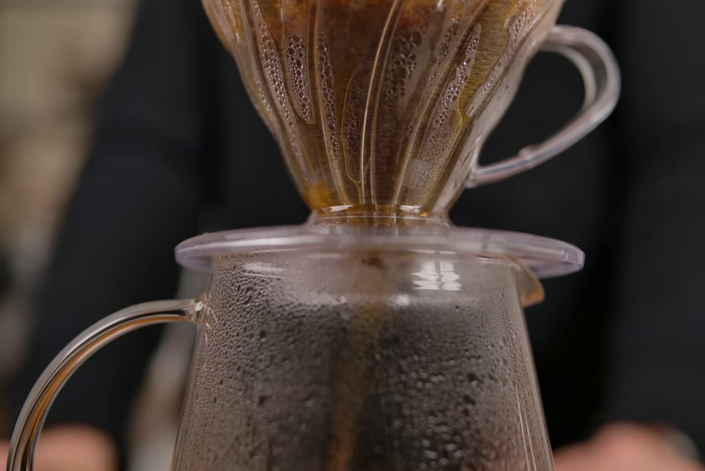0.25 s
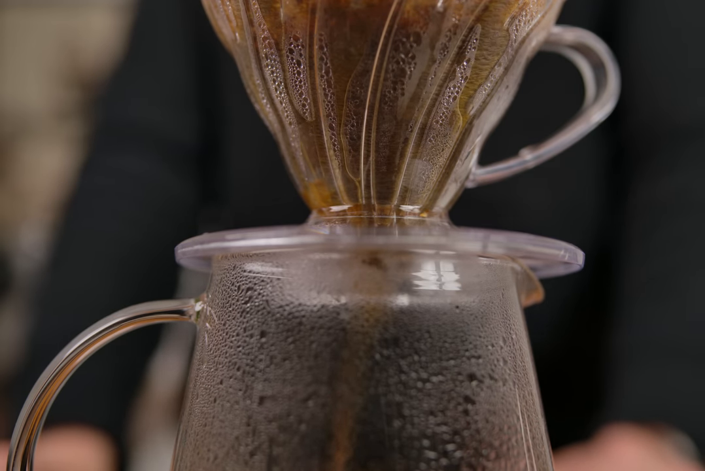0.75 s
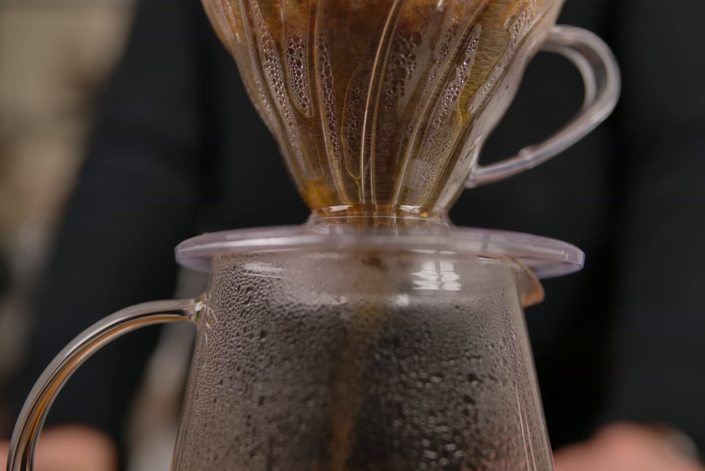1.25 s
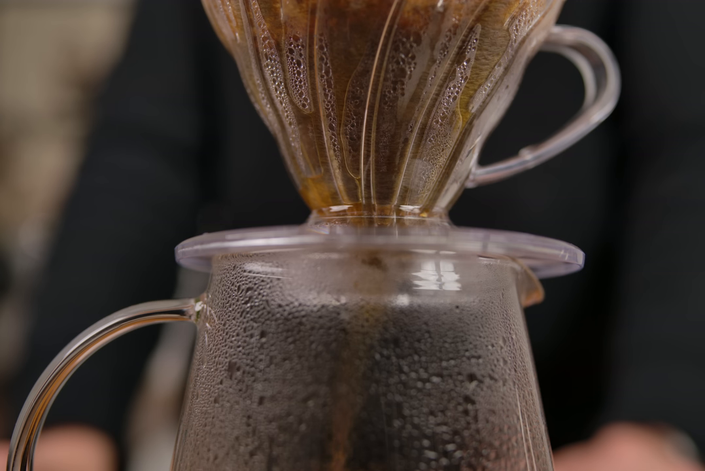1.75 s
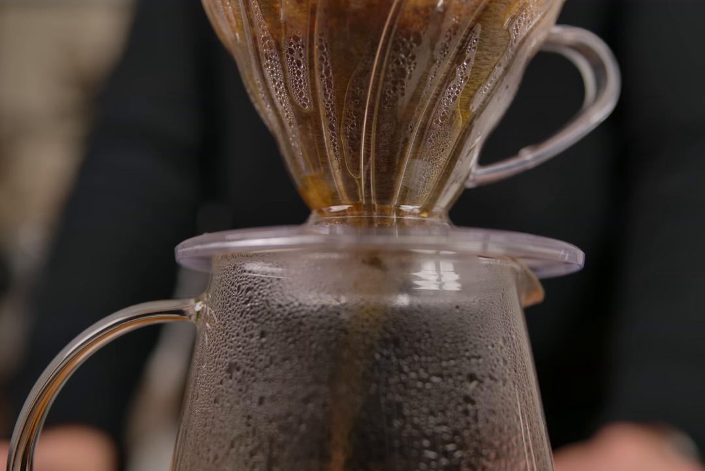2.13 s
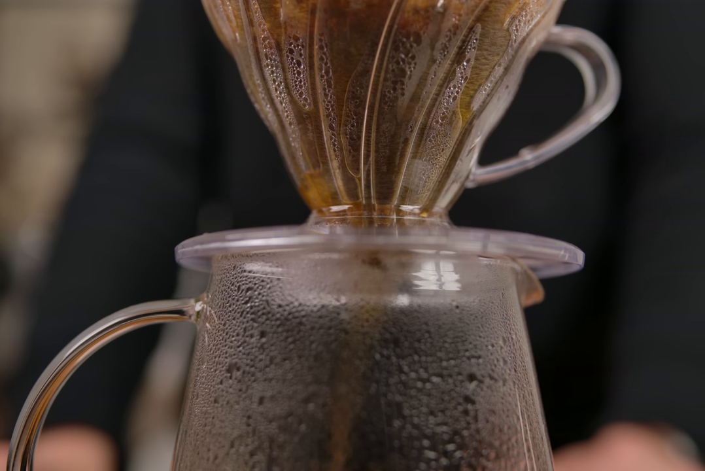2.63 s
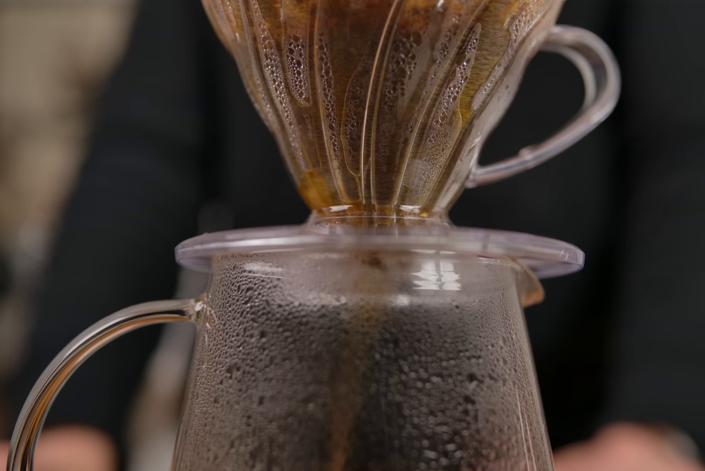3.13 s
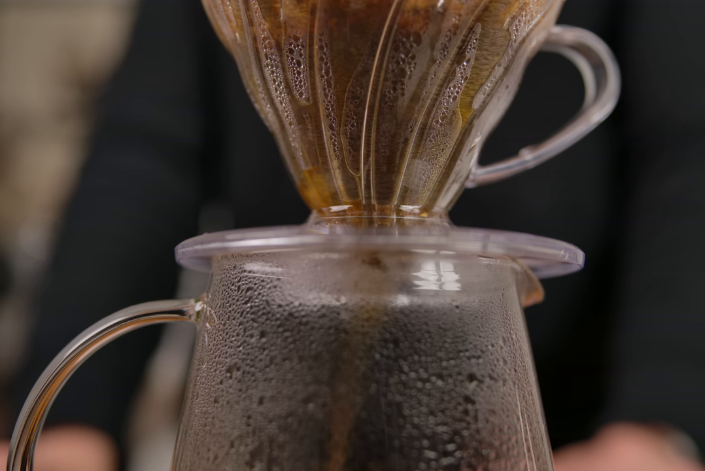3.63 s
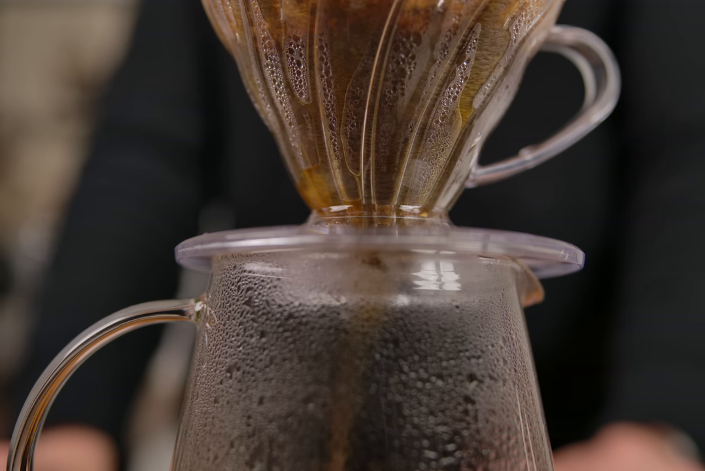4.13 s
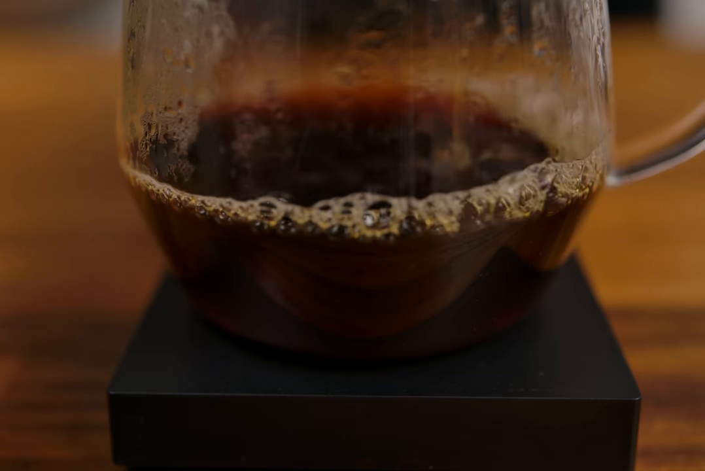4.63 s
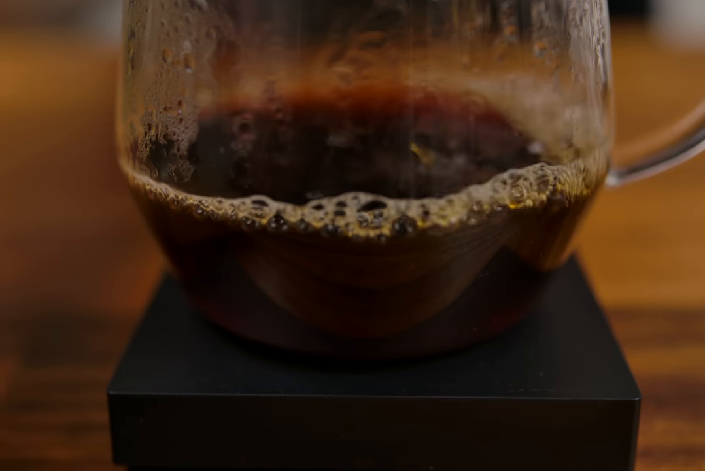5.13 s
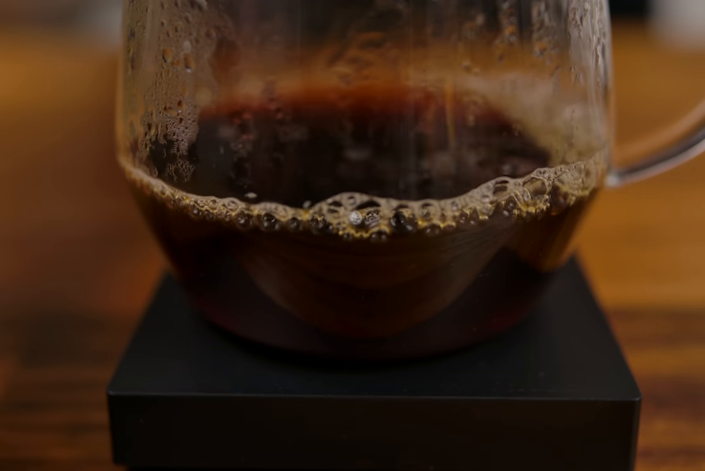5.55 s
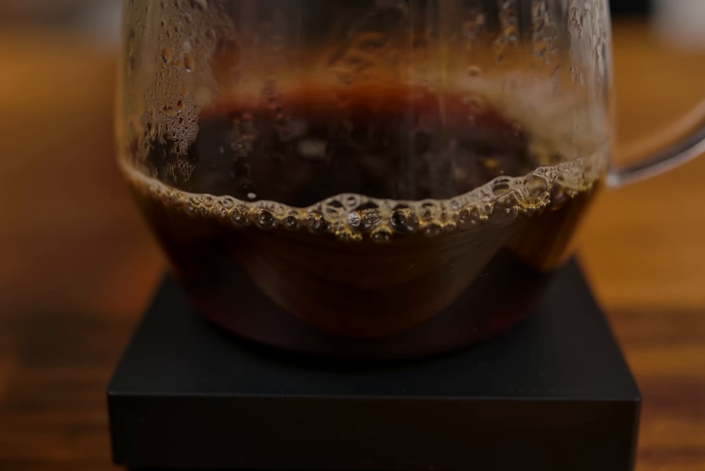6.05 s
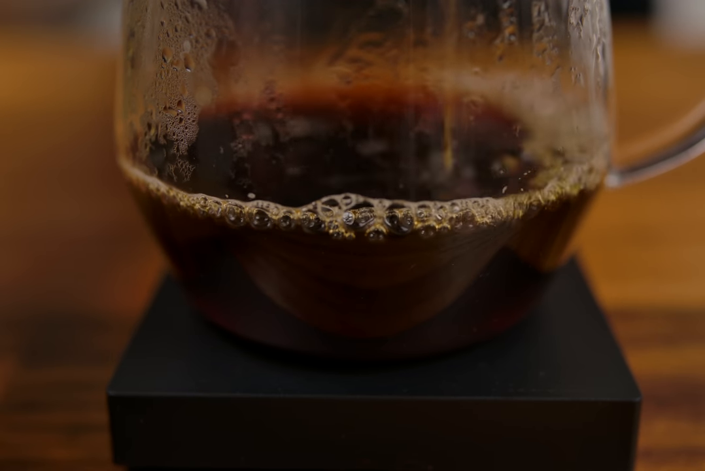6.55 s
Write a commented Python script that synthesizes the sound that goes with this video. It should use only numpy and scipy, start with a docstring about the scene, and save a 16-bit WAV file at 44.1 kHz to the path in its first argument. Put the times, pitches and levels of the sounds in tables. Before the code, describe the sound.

A steady, uneven trickle of drops falls into coffee in a glass vessel, already under way at the start. Watery plips vary between low and bright pitches, with small slaps, hollow air-column knocks and fine spray ticks. Foam bubbles pop sharply in between. The flow continues throughout, loosening late on. Heard very close and centred, with short reflections and a quiet rumbling room.

```python
"""Brewed coffee runs into a half-filled glass server, close-miked, over a soft room rumble and faint hiss.
From the start a thin stream patters as beads, tiny bubbles and fine splashes, with a treble fizz and haze.
Almost at once froth bubbles begin to burst, each a film snap with an upward chirp from its cavity.
Drops follow: each rings a trapped bubble, slaps the surface, booms the air column, thuds the server
and throws spray, then a smaller satellite trails it. The server's modes and a short room echo colour the coffee."""
import sys
import numpy as np
from scipy import signal
from scipy.fft import rfft, irfft, next_fast_len
from scipy.io import wavfile
from scipy.ndimage import uniform_filter1d

SR = 44100
rng = np.random.default_rng(int(sys.argv[2]) if len(sys.argv) > 2 else 0)


def output_pcm(signal):
    """Save a mono or channel-first signal as 16-bit PCM at the path in sys.argv[1].

    Samples are clipped to [-1, 1] before scaling.
    """
    pcm = np.clip(np.atleast_2d(signal).T, -1, 1) * 32767
    wavfile.write(sys.argv[1], SR, np.round(pcm).astype(np.int16))


N = 299880
RING = np.arange(4096) / SR  # time axis of one ringing sound (s)

# Room tone spectra. Each row: frequency in Hz, relative gain in dB.
RUMBLE_COLOUR = [(20, -15), (35, -34), (55, -9), (80, -0.5), (105, 1), (135, -3), (180, -12), (310, -15.5),
                 (372, -6.5), (450, -19), (570, -22.5), (680, -28.5), (1500, -34), (4000, -44.5)]
HISS_COLOUR = [(500, -3), (3000, 16.5), (6000, 6.5), (10000, 2.5), (16000, -35)]

# Resonances of the server and the air in it. Each row: centre in Hz before detuning, width in Hz,
# peak gain in dB over a unit impulse before the landing spot's scatter.
SERVER_MODES = [(374, 42, 16), (560, 100, 7), (890, 130, 11), (1122, 80, 11), (1310, 45, 5), (1382, 45, 5),
                (1580, 150, 4), (1748, 65, 9), (1880, 70, 7), (1955, 45, 14), (2332, 35, 15),
                (2435, 70, 10), (2514, 30, 19), (2980, 260, 4), (3555, 140, 13), (4820, 90, 6),
                (4930, 130, 13), (5115, 50, 18), (5372, 45, 11), (5945, 60, 13), (6500, 190, 14),
                (7200, 400, 2), (7730, 110, 4), (8350, 260, 7), (9300, 420, 3), (13000, 700, 3)]
SLOSH = .003  # scatter of the mode pitches from the rocking surface, as a share

# Thin stream. Each row: time in seconds, level in dB before the patter and bead trims.
STREAM_LEVEL = [(0.0, -52), (0.09, -52.5), (0.64, -57.5), (1.19, -53), (1.61, -62), (1.87, -55),
                (2.05, -57.5), (2.4, -55.5), (2.56, -54), (3.03, -58), (3.2, -57.5), (3.31, -54),
                (3.45, -67), (3.56, -51), (3.81, -54.5), (4.11, -57.5), (4.24, -60.5), (4.51, -51),
                (4.75, -61), (4.96, -57.5), (5.36, -62), (5.51, -54.5), (5.79, -56), (6.02, -52.5),
                (6.19, -57.5), (6.8, -58.5)]
# Treble fizz of the stream. Each row: time in seconds, level in dB before the fizz trim.
FIZZ_LEVEL = [(0, -65.5), (0.3, -61.5), (0.48, -69), (0.62, -60.5), (0.83, -68), (1.05, -65), (1.32, -62.5),
              (1.6, -67.5), (2.25, -63.5), (2.55, -62), (2.8, -65), (3.42, -63), (3.56, -58), (4.2, -72.5),
              (4.55, -61), (4.85, -66.5), (5.5, -62), (5.83, -72), (6.08, -61), (6.3, -70.5), (6.8, -65.5)]
PATTER_TRIM_DB, BEADS_TRIM_DB, FIZZ_TRIM_DB = -5, -3, -0.5
# Spectral shaping of patter, fizz and haze. Each row: frequency in Hz, relative gain in dB.
PATTER_COLOUR = [(300, 29.5), (650, 12), (900, 10.5), (1300, -12), (1900, 15), (2500, 9), (3000, -10),
                 (4000, 2), (8000, -22)]
FIZZ_COLOUR = [(1000, -18), (3000, 5), (4300, 12.5), (5100, -3), (6000, 3), (7500, 2), (11000, -3),
               (16000, 2)]
HAZE_COLOUR = [(1000, -31), (2800, -0.5), (4000, 0.5), (6500, -10.5), (9000, -14), (16000, -28)]
# where the fizz is densest it merges into a smooth hiss: top level (dB), dB per dB of fizz
HAZE_DB, HAZE_GROWS = -65, 1.8
STIR, STIR_S = 0.32, 0.0025  # rms share by which drops stir up the flow, time to peak (s)
LULL, LULL_S = 0.35, 0.005  # share lost as the stream necks off, deepest this long before a drop (s)
SPLASH_LIFE_S, SPLASH_RANGE_DB = 0.0013, 29  # time to peak; largest splash over the smallest
# Beads of the stream. Each row: time in seconds, typical bubble pitch in Hz before scatter.
BEAD_PITCH = [(0, 1575), (1.5, 1450), (2.4, 1720), (6.8, 1823)]
# level scatter (dB), typical bubble time to peak (s), spray against bubble (dB)
BEAD_SCATTER_DB, BEAD_LIFE_S, BEAD_SPRAY_DB = 3.5, 0.00067, -13.5

# Froth bubble bursts. Each row: start in seconds, peak in dB before ping and snap trims, pitch in Hz.
POPS = [(0.045, -42.5, 12300), (0.348, -46, 6600), (0.4244, -37.5, 9300), (0.5557, -41, 6130),
        (0.619, -40.5, 4800), (0.6475, -43.5, 8800), (0.715, -42.5, 6400), (0.7802, -36, 8950),
        (0.8076, -42, 6440), (0.938, -61, 14000), (1.1368, -46, 7700), (1.1558, -47, 14300),
        (1.3156, -26, 5910), (1.5047, -44, 6800), (1.667, -42.5, 9640), (1.7988, -38, 5440),
        (1.9045, -42, 4190), (1.9061, -41.5, 6570), (2.102, -40, 3470), (2.1636, -40.5, 13400),
        (2.2547, -47, 8380), (2.4112, -40, 6240), (2.546, -43, 6230), (2.61, -41.5, 8070),
        (2.639, -39.5, 5540), (2.7314, -40, 6930), (2.833, -48, 7200), (2.947, -51, 6400),
        (3.3462, -38, 6300), (3.398, -48, 3500), (3.4447, -45.5, 7160), (3.566, -51, 5900),
        (3.5903, -41, 6340), (3.696, -38, 8260), (3.886, -42.5, 3550), (3.937, -49, 3700), (4, -44, 13600),
        (4.058, -45, 3780), (4.2819, -34.5, 6400), (4.3854, -49, 9170), (4.463, -46.5, 6770),
        (4.525, -40.5, 8300), (4.606, -48.5, 6400), (4.8937, -44.5, 12800), (4.84, -45, 3470),
        (4.911, -37, 3730), (4.941, -47, 4200), (4.974, -43.5, 3450), (5.121, -28.5, 3520),
        (5.267, -41, 4300), (5.3755, -44.5, 4100), (5.385, -38.5, 3750), (5.53, -29.5, 6740),
        (5.611, -40.5, 3540), (5.91, -42, 6330), (6.008, -45, 3300), (6.093, -47, 3740),
        (6.1167, -43.5, 6600), (6.2413, -42, 4300), (6.327, -40, 10500), (6.374, -42.5, 4540),
        (6.481, -40.5, 5100), (6.516, -42, 3650), (6.6548, -43.5, 6360), (6.675, -46.5, 2850)]
# Upward sweep of a burst; loud ones hold pitch better. Each row: peak in dB, most octaves either side.
POP_SWEEP = [(-42, .35), (-32, .16)]
POP_LIFE_S, PING_DB, SNAP_DB = 0.00142, -8, -7  # cavity's time to peak; levels against the burst's peak
LARGE_POP_HZ, LARGE_DB = 6470, 9.5  # under this pitch a burst trades snap for ping (dB per octave)

# Drops. Each row: start in seconds, peak in dB, bubble pitch in Hz, impact in dB, spray in dB;
# the levels are before the trims of each part.
DROPS = [(0.063, -45, 1040, -47, -63), (0.076, -29, 1230, -52.5, -88), (0.091, -36.5, 1920, -53, -69),
         (0.133, -42.5, 1860, -61, -70), (0.147, -45, 1890, -60, -67), (0.168, -35.5, 1980, -60, -60),
         (0.187, -35, 2680, -62, -69), (0.229, -32.5, 1360, -47.5, -49), (0.313, -32.5, 1970, -55, -48),
         (0.333, -37.5, 1310, -57, -50), (0.402, -30, 1140, -47.5, -63), (0.474, -35, 1320, -68, -59),
         (0.485, -40.5, 1980, -60, -43), (0.549, -37.5, 1198, -56.5, -49), (0.581, -36, 1900, -52.5, -61),
         (0.638, -36.5, 1940, -55, -51), (0.695, -40.5, 1920, -61, -72), (0.714, -36, 1180, -55, -92),
         (0.803, -42.5, 1920, -54, -71), (0.836, -38.5, 1240, -54, -56), (0.873, -44, 1270, -55, -59),
         (0.986, -38.5, 1930, -51, -72), (1.003, -57, 2040, -55.5, -60), (1.036, -39, 1200, -54, -50),
         (1.077, -37, 1100, -60, -47.5), (1.09, -41, 1100, -71, -48), (1.173, -33.5, 1624, -55, -47.5),
         (1.181, -36.5, 2560, -69, -66), (1.2528, -38, 870, -56, -63), (1.302, -48, 980, -73, -58),
         (1.33, -37.5, 1275, -53, -60), (1.341, -37.5, 1080, -68, -68), (1.349, -45, 805, -75, -68),
         (1.397, -42, 1940, -54.5, -52), (1.468, -34.5, 1750, -51.5, -52), (1.486, -39, 1460, -58, -81),
         (1.523, -43, 1220, -54, -67), (1.559, -30.5, 1885, -53.5, -58), (1.643, -31.5, 1750, -55, -38),
         (1.687, -36, 1310, -53, -54), (1.815, -42, 1260, -45.5, -35.5), (1.883, -42, 1880, -66, -76),
         (1.96, -39, 1580, -57, -66), (1.992, -37, 1440, -54, -66), (2.104, -38.5, 2610, -78, -45.5),
         (2.141, -37.5, 1850, -86, -81), (2.18, -39, 1750, -77, -52), (2.216, -42.5, 1220, -58, -70),
         (2.308, -44, 1200, -65, -49), (2.33, -37, 2560, -56, -61), (2.359, -37.5, 2480, -75, -48.5),
         (2.394, -43, 1570, -65, -71), (2.436, -41, 1920, -55.5, -67), (2.48, -35.5, 1050, -75, -56),
         (2.523, -42, 1210, -66, -64), (2.575, -34, 1210, -54, -74), (2.621, -34.5, 2360, -48.5, -49),
         (2.654, -35.5, 1890, -75, -45.5), (2.706, -39, 1780, -68, -70), (2.726, -37, 2000, -78, -67),
         (2.789, -42, 1820, -61, -72), (2.804, -33.5, 1600, -78, -71), (2.829, -38.5, 1135, -65, -40),
         (2.957, -41.5, 1070, -50, -76), (2.969, -31.5, 1780, -54, -88), (2.995, -31.5, 1840, -50, -66),
         (3.019, -35, 1560, -59, -56), (3.114, -40, 1490, -57.5, -68), (3.186, -43, 1060, -52, -61),
         (3.203, -28, 1850, -50, -43), (3.234, -37.5, 1900, -57, -68), (3.291, -28.5, 1856, -51.5, -63),
         (3.319, -42, 1090, -55, -50), (3.354, -48, 1950, -50, -62), (3.377, -41, 1880, -44.5, -59),
         (3.401, -34.5, 1460, -82, -72), (3.432, -37.5, 1026, -77, -72), (3.492, -33, 2520, -57, -71),
         (3.517, -36.5, 2490, -71, -48), (3.538, -40, 2320, -59, -51), (3.559, -28, 1790, -52.5, -51),
         (3.624, -35.5, 1910, -49.5, -63), (3.661, -44, 1960, -66, -62), (3.686, -40, 2480, -54, -60),
         (3.717, -43, 2490, -66, -69), (3.732, -39, 2010, -82, -104), (3.798, -37, 1870, -58, -90),
         (3.91, -28, 1750, -52, -50), (3.94, -43.5, 1530, -75, -66), (3.985, -39.5, 1160, -54, -78),
         (4.106, -45, 1550, -57, -70), (4.127, -41, 1180, -57.5, -75), (4.177, -40, 1770, -57, -55),
         (4.273, -38.5, 1650, -57.5, -67), (4.3, -44, 1750, -55, -60), (4.314, -43, 1180, -55, -68),
         (4.337, -34.5, 900, -52, -56), (4.348, -31.5, 1830, -47, -46), (4.425, -48, 1900, -62, -71),
         (4.471, -43, 1240, -77, -70), (4.501, -33, 1460, -54, -64), (4.604, -41, 1650, -60, -53),
         (4.621, -36, 1820, -56.5, -61), (4.642, -31, 1750, -53.5, -45), (4.762, -34.5, 2070, -54, -49),
         (4.937, -40, 1710, -68, -68), (5.031, -48, 1610, -54, -47), (5.041, -46, 1490, -71, -61),
         (5.137, -38, 1760, -60, -48), (5.192, -40.5, 1844, -55, -72), (5.213, -31, 1750, -58, -53),
         (5.276, -29.5, 1050, -46.5, -58), (5.311, -38, 1090, -66, -48), (5.376, -46, 1680, -63, -56),
         (5.384, -33, 1750, -56, -42), (5.418, -38, 1865, -65, -49), (5.439, -32.5, 1750, -54, -72),
         (5.484, -37, 1660, -70, -69), (5.576, -38.5, 1860, -56, -53), (5.613, -43.5, 1490, -75, -79),
         (5.74, -35, 2150, -51.5, -36.5), (5.826, -43, 2600, -55, -53), (5.838, -37.5, 1490, -52, -55),
         (5.918, -36, 1620, -61, -56), (5.934, -48, 2320, -75, -61), (5.984, -42, 1630, -72, -63),
         (6.008, -32.5, 1680, -52.5, -42), (6.017, -39, 1680, -50.5, -47), (6.138, -37, 2250, -53.5, -33.5),
         (6.222, -36.5, 2030, -59, -54), (6.325, -40, 1720, -56, -61), (6.391, -46, 1040, -72, -73),
         (6.424, -36, 1480, -66, -52), (6.517, -39, 2330, -78, -55), (6.714, -35, 1874, -77, -56),
         (6.79, -30, 1536, -45.5, -48)]
# a smaller satellite trails each drop: delay (s) and its log scatter, level under the drop (dB),
# pitch (Hz) and its log scatter
SATELLITE_S, SATELLITE_LAG_SCATTER, SATELLITE_DB = .025, .25, -11
SATELLITE_HZ, SATELLITE_PITCH_SCATTER = 1750, 0.196
# bubbles under the steady pitch sag, those over it rise: share of pitch per octave, steady pitch (Hz)
GLIDE_PER_OCT, STEADY_HZ = 0.11, 1450
BUBBLE_LIFE_S, LIFE_SCATTER = 0.0019, .25  # swell time of a bubble at the steady pitch; log scatter
PINCH_S = 0.0077  # a bubble is loudest as it pinches off; this time on, its gain is halved
PLINK_DB = -2  # bubble against the drop's peak
SLAP_DB, KNOCK_DB = 10.5, 5.5  # slap and air-column boom against the impact
THUD_HZ, THUD_S, THUD_DB = 111.2, 0.0067, 1  # server on its stand: pitch, time to peak, against the impact
TINKLE_DB, TICK_DB = -3, -13.5  # ringing modes and tick on the glass against the spray

TOP_HZ = 15900  # upper band limit


def amp(db):
    """Decibels to gain."""
    return 10 ** (np.asarray(db) / 20)


def unit(x):
    """x at rms 1."""
    return x / np.sqrt(np.mean(x ** 2) + 1e-20)


def curve(rows):
    """One value per sample, drawn straight between (s, value) points."""
    s, value = np.transpose(rows)
    return np.interp(np.arange(N) / SR, s, value)


def coloured(x, points):
    """x through a smooth spectrum of (Hz, dB) points."""
    size = next_fast_len(N + SR // 2)
    hz, db = np.transpose(points)
    bins_hz = np.fft.rfftfreq(size, 1 / SR)
    gain = amp(np.interp(np.log(bins_hz + 1), np.log(hz), db))
    return irfft(rfft(x, size) * gain, size)[:N]


def band(x, low_hz, high_hz):
    """A gentle causal band-pass."""
    edges = np.clip([low_hz, high_hz], 1, SR / 2 - 1)
    return signal.sosfilt(signal.butter(2, edges, "band", fs=SR, output="sos"), x)


def placed(times, sounds):
    """Sum the rows of sounds, each starting at its time in seconds."""
    starts = np.round(np.maximum(times, 0) * SR).astype(int).reshape(-1, 1)
    at = starts + np.arange(sounds.shape[1])
    return np.bincount(at.ravel(), sounds.ravel(), N)[:N]


def spaced(shifts):
    """Start times (s) spread evenly over the scene, each shifted by a number of spacings."""
    count = len(shifts)
    return (np.arange(count)[:, None] + shifts) / count * N / SR


def peaked(sounds, db):
    """Each row scaled so that its smoothed envelope peaks at db within the first 25 ms."""
    power = uniform_filter1d(sounds[:, :SR // 40] ** 2, SR // 1000, axis=1)
    return amp(db) * sounds / np.sqrt(2 * power.max(axis=1, keepdims=True) + 1e-20)


def swell(t, life):
    """An envelope that peaks at 1 after one life, then dies away."""
    u = t / np.maximum(life, 1e-5)
    return u * np.exp(1 - u)


def bubble(t, hz, life, rise):
    """A bubble's few cycles; its pitch climbs for a positive rise and sags for a negative one."""
    glide = 1 + rise * np.tanh(t / np.maximum(life, 1e-5) / 2 - 1)
    return swell(t, life) * np.sin(2 * np.pi * np.cumsum(hz * glide, axis=1) / SR)


def server(count, direct, walls_db, size=8):
    """Server impulse responses: each landing spot feeds the modes differently and scatters off the glass;
    the modes come in `size` detuned sets."""
    hz, width, db = np.transpose(SERVER_MODES)[:, :, None]
    hz = hz * (1 + SLOSH * rng.standard_normal((size, len(SERVER_MODES), 1)))
    decay = 2 * np.pi * width / SR * np.exp(-np.pi * width * RING)
    modes = amp(db) * decay * np.cos(2 * np.pi * hz * RING)
    feeds = amp(3 * rng.standard_normal((size, count // size + 1, len(SERVER_MODES))))
    rings = rng.permutation((feeds @ modes).reshape(-1, len(RING)))[:count]
    fade = amp(-60 * RING / .028)  # the scatter falls 60 dB in 28 ms
    walls = rng.standard_normal((count, len(RING))) * fade / np.linalg.norm(fade)
    return direct * (RING == 0) + rings + amp(walls_db) * walls


def ringing(sounds, responses):
    """Each row through its own response."""
    return signal.fftconvolve(sounds, responses, axes=1)[:, :sounds.shape[1]]


def at_spots(grains, direct, walls_db):
    """Each grain rings the server from one of 40 landing spots, picked at random."""
    spots = server(count=40, direct=direct, walls_db=walls_db)[:, :SR // 12]
    picks = rng.integers(len(spots), size=len(grains))
    return signal.fftconvolve(grains, spots[picks], axes=1)


def room():
    """Low room rumble and the microphone's faint hiss, both as shaped noise."""
    rumble = amp(-54.5) * unit(coloured(rng.standard_normal(N), RUMBLE_COLOUR))
    hiss = amp(-74.5) * unit(coloured(rng.standard_normal(N), HISS_COLOUR))
    return rumble + hiss


def echo(x, t60):
    """The short answer of a small room: quickly swelling noise that falls 60 dB in t60 seconds."""
    t = np.arange(SR // 4) / SR
    tail = rng.standard_normal(len(t)) * amp(-60 * t / t60) * (1 - np.exp(-t / 0.00073))
    return signal.fftconvolve(x, tail / np.linalg.norm(tail))[:N]


def beads(count):
    """The stream breaks into a nearly even train: each bead traps a tiny bubble and throws a little spray."""
    t = RING[:SR // 80]
    when, size, pitch, span = rng.standard_normal((count, 4)).T[:, :, None]
    s = spaced(.3 * when)
    hz = np.interp(s, *np.transpose(BEAD_PITCH)) * np.exp(.2 * np.minimum(pitch, 1.5))
    life = BEAD_LIFE_S * 2 ** np.tanh(span / 2)
    blip = unit(bubble(t, hz, life, rise=0.16))
    spray_noise = swell(t, 0.0014) * rng.standard_normal((count, len(t)))
    spray = unit(band(spray_noise, 1950, 6200))
    level = amp(BEAD_SCATTER_DB * np.minimum(size, 1.5))
    grains = level * (blip + amp(BEAD_SPRAY_DB) * spray)
    vessel = server(count, direct=.3, walls_db=-17)
    return placed(s, signal.fftconvolve(grains, vessel, axes=1))


def droplets(hz, spread, life, size_db, direct, walls_db, count):
    """Tiny bubbles at random moments; smaller ones ring higher and die sooner."""
    when, size, pitch, span = rng.random((count, 4)).T[:, :, None]
    pitch_hz = hz * np.exp(spread * (2 * pitch - 1))
    lives = life * (.5 + span) * np.sqrt(hz / pitch_hz)
    grains = bubble(RING[:SR // 100], pitch_hz, lives, rise=.08)
    level = amp(size_db * size ** 3)  # the cube leaves only a few loud ones
    return placed(spaced(3 * when - 1), level * at_spots(grains, direct, walls_db))


def splashes(count):
    """Fine splashes at random moments: brief puffs of noisy spray that ring the server."""
    when, size = rng.random((count, 2)).T[:, :, None]
    t = RING[:SR // 80]
    puffs = swell(t, SPLASH_LIFE_S) * rng.standard_normal((count, len(t)))
    level = amp(SPLASH_RANGE_DB * size ** 3)
    return placed(spaced(3 * when - 1), level * at_spots(puffs, direct=.25, walls_db=-14))


def stream():
    """Beads, bubbles and fine splashes of the stream; it falters before a drop and is busiest just after."""
    stream_db = curve(STREAM_LEVEL)
    fizz_db = curve(FIZZ_LEVEL) + FIZZ_TRIM_DB
    s, db = np.transpose(DROPS)[:2, :, None]
    stirred = 1 + STIR * unit(placed(s, np.sqrt(amp(db)) * swell(RING, STIR_S)))
    # laid out backwards in time, so that each lull leads up to its drop
    necking = placed(N / SR - s, swell(RING, LULL_S) * np.ones_like(s))[::-1]
    flow = stirred * (1 - np.clip(LULL * necking, 0, 1))

    bubbles = droplets(hz=1900, spread=.7, life=.0004, size_db=12, direct=.3, walls_db=-14, count=800)
    patter = amp(stream_db + PATTER_TRIM_DB) * unit(flow * coloured(bubbles, PATTER_COLOUR))
    train = amp(stream_db + BEADS_TRIM_DB) * unit(flow * beads(count=440))
    fizz = amp(fizz_db) * unit(flow * coloured(splashes(count=640), FIZZ_COLOUR))
    haze_db = HAZE_DB + HAZE_GROWS * (fizz_db - fizz_db.max())
    haze = amp(haze_db) * unit(coloured(rng.standard_normal(N), HAZE_COLOUR))
    return train + patter + haze + fizz


def pops():
    """A froth bubble bursts: the film snaps and the cavity chirps upward as the hole in the film widens."""
    s, db, hz = np.transpose(POPS)[:, :, None]
    vessel = server(len(s), direct=.4, walls_db=-6)
    large_db = LARGE_DB * np.maximum(np.log2(LARGE_POP_HZ / hz), 0)
    octaves = np.interp(db, *np.transpose(POP_SWEEP)) * np.tanh(RING / POP_LIFE_S - 1)
    sweep_hz = np.minimum(hz * 2 ** octaves, SR / 2)
    chirp = swell(RING, POP_LIFE_S) ** 2 * np.sin(2 * np.pi * np.cumsum(sweep_hz, axis=1) / SR)
    ping = peaked(ringing(chirp, vessel), db + PING_DB + large_db)
    film = band(swell(RING, .001) * rng.standard_normal(vessel.shape), 6600, 16000)
    snap = peaked(ringing(film, vessel), db + SNAP_DB - large_db)
    return placed(s, ping + snap)


def drips():
    """Every drop, then every satellite, as rows of start, peak, pitch, impact and spray."""
    s, db, hz, impact_db, spray_db = np.transpose(DROPS)
    lag, pitch = rng.standard_normal((len(s), 2)).T
    satellites = [s + SATELLITE_S * np.exp(SATELLITE_LAG_SCATTER * lag),
                  db + SATELLITE_DB,
                  SATELLITE_HZ * np.exp(SATELLITE_PITCH_SCATTER * pitch),
                  impact_db + SATELLITE_DB,
                  spray_db + SATELLITE_DB]
    return np.hstack([np.transpose(DROPS), satellites])[:, :, None]


def drops():
    """A drop rings a bubble, pushes the air in the server and throws fine spray."""
    s, db, hz, impact_db, spray_db = drips()
    vessel = server(len(s), direct=.6, walls_db=-10)

    life = BUBBLE_LIFE_S * np.sqrt(STEADY_HZ / hz) * np.exp(LIFE_SCATTER * rng.standard_normal(s.shape))
    rise = GLIDE_PER_OCT * np.log2(hz / STEADY_HZ)
    trapped = bubble(RING, hz, life, rise) / (1 + RING / PINCH_S)
    plink = peaked(ringing(trapped, vessel), db + PLINK_DB)

    # the impact is a brief slap that wakes all the middle modes at once
    hit = band(swell(RING, .0009) * rng.standard_normal(vessel.shape), 900, 2500)
    slap = peaked(ringing(hit, vessel), impact_db + SLAP_DB)

    # the crater pushes the whole air column: its lowest mode booms
    push = band(swell(RING, 0.00019), 344, 504) * np.ones_like(s)
    knock = peaked(ringing(push, vessel), impact_db + KNOCK_DB)

    # the push also rocks the server on its stand: a soft low thud
    thud = amp(impact_db + THUD_DB) * swell(RING, THUD_S) * np.sin(2 * np.pi * THUD_HZ * RING)

    # spray lands up to 2.5 ms later: it tinkles in the modes near 5 kHz and ticks on the glass
    spray = swell(RING, .001) * rng.standard_normal(vessel.shape)
    tinkle = peaked(ringing(band(spray, 4800, 5500), vessel), spray_db + TINKLE_DB)
    tick = peaked(ringing(band(spray, 4500, 13000), vessel), spray_db + TICK_DB)
    landing = s + 0.0025 * rng.random(s.shape)
    return placed(s, plink + slap + knock + thud) + placed(landing, tinkle + tick)


def scene():
    """Coffee, its echo and the room reach one microphone, which feeds both channels."""
    coffee = stream() + pops() + drops()
    mono = coffee + amp(-7) * echo(coffee, t60=0.038) + room()
    return np.array([mono, mono])


def record(dry):
    """A steep band limit keeps nothing from TOP_HZ up."""
    size = next_fast_len(N + SR // 2)
    kept = np.fft.rfftfreq(size, 1 / SR) < TOP_HZ
    return irfft(rfft(dry, size) * kept, size)[:, :N]


dry = scene()
out = record(dry)
output_pcm(out)
```